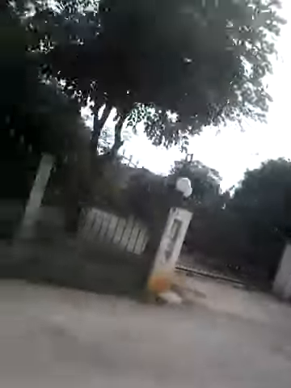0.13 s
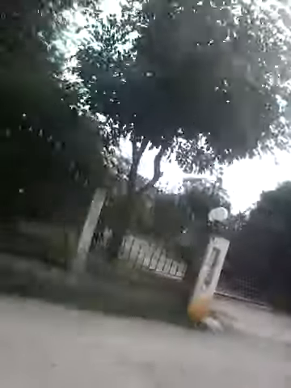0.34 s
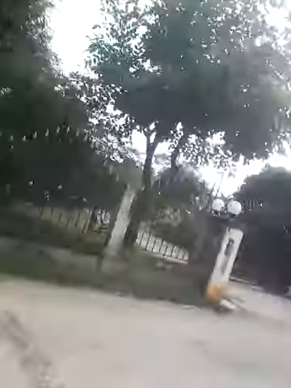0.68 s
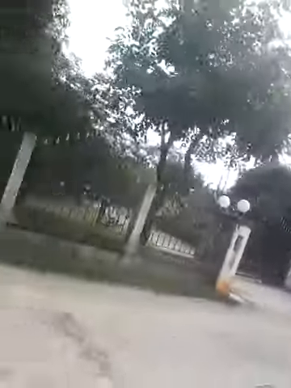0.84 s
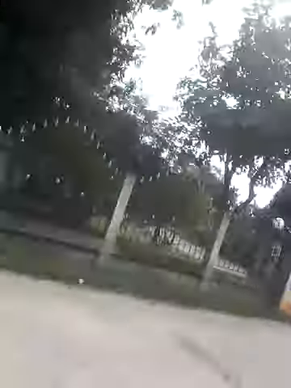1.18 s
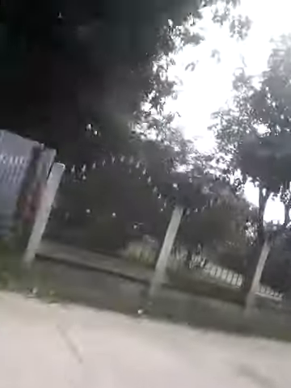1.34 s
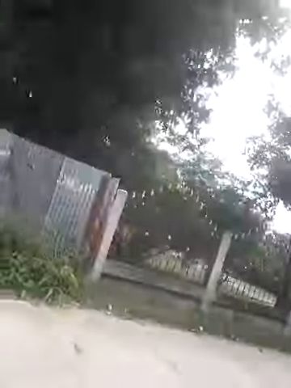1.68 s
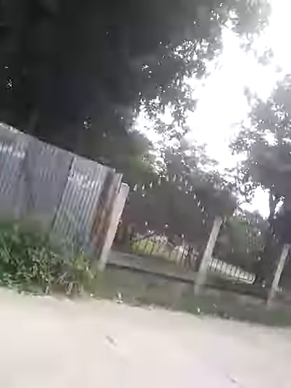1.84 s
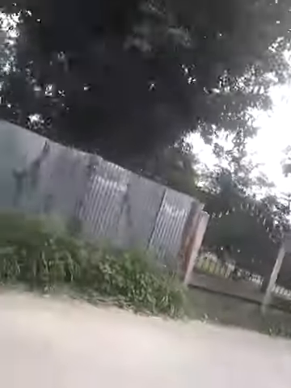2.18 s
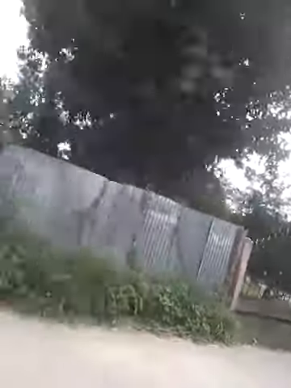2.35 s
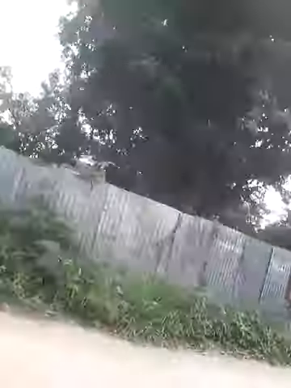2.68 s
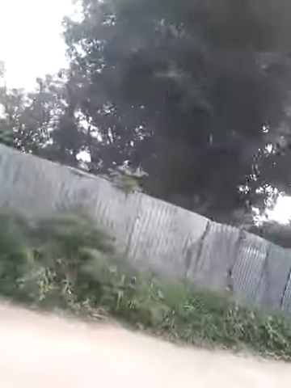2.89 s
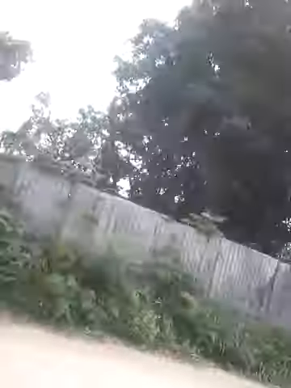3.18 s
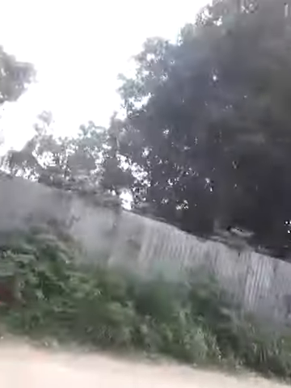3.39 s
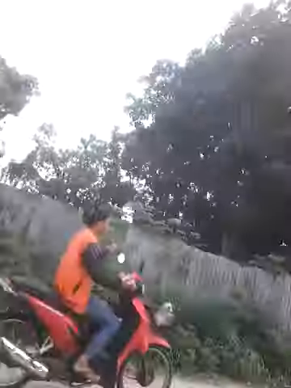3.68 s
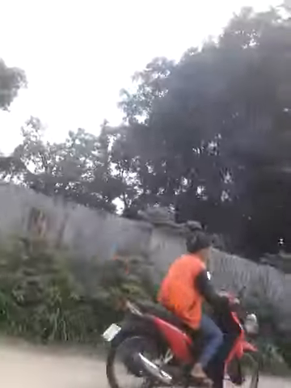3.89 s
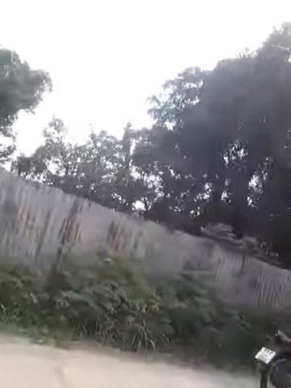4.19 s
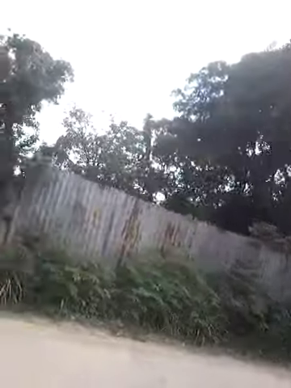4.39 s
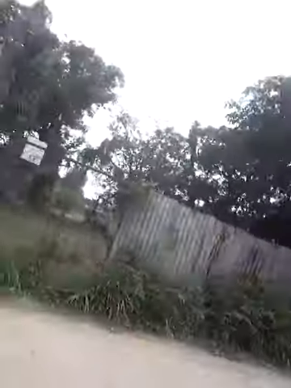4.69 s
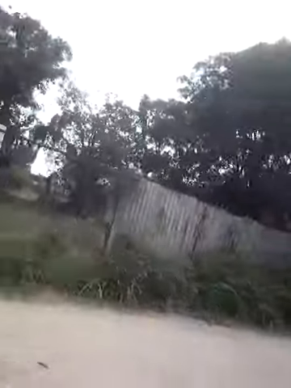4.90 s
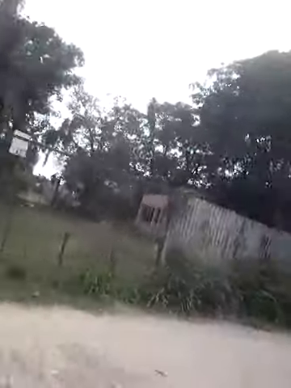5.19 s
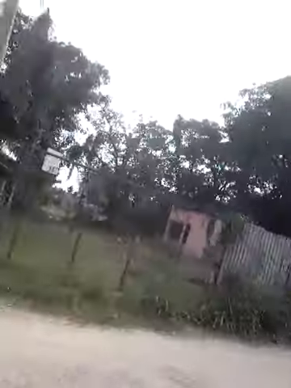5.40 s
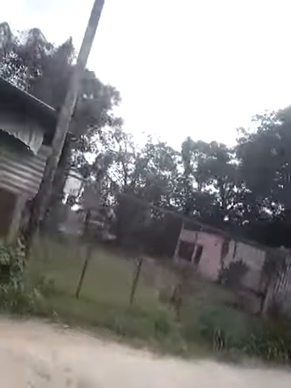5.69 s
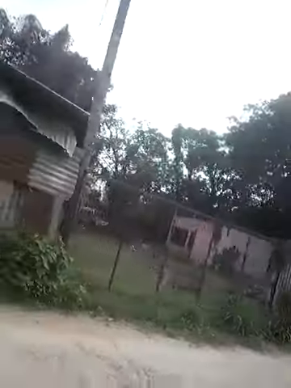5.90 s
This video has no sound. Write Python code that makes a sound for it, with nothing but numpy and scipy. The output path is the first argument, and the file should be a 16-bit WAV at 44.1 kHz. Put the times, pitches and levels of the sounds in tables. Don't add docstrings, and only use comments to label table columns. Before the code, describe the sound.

From a phone carried on a bicycle: tyres roar softly on grit, dull knocks come in irregular pairs, and loose metal ticks. A far vehicle hums by early. A small motorcycle then approaches, its exhaust thumping separately at each firing, passes very close with chain clatter and brief gear whine, and recedes. Hand rubs and one very hard tap hit the housing late, over low wind buffets.

```python
import sys
import numpy as np
from scipy import signal
from scipy.io import wavfile
from scipy.ndimage import uniform_filter1d, minimum_filter1d

SR = 44100
rng = np.random.default_rng(int(sys.argv[2]) if len(sys.argv) > 2 else 0)


def wav_out(sig):
    wavfile.write(sys.argv[1], SR, np.round(np.clip(np.atleast_2d(sig).T, -1, 1) * 32767).astype(np.int16))


def invert_db(x):
    u = np.asarray(x, float) / 20
    return 10 ** u


N = 266422
TIME_S = np.arange(N) / SR

# start_s, peak_db, pitch_hz, t60_s (time to fall 60 dB), swell_cycles
HARD_BUMPS = [(0.763, -19.5, 177, 0.19, 0.14), (.779, -18.5, 267, 0.016, 0.27),
              (1.0615, -9, 204.4, 0.028, 0.95), (1.078, -11, 158, 0.009, 0.23),
              (1.697, -9, 235, 0.032, 0.68), (1.7117, -15.5, 187, .053, 0.05),
              (1.961, -21, 204, 0.021, 0.093), (1.981, -19, 189, 0.081, 0.25),
              (3.7269, -11, 308, 0.025, 0.13), (3.7318, -21, 252.6, 0.084, 0.34),
              (3.7424, -12.5, 199, 0.016, 0.11), (3.7495, -11, 195.4, 0.062, 0.19),
              (3.7665, -13.5, 148, 0.01, 0.22), (4.002, -9.5, 171, 0.01, 0.038),
              (4.0244, -14.5, 192, .037, 0.26), (4.5946, -10, 193, 0.053, 0.13),
              (4.8379, -25, 276, 0.17, 0.54), (4.872, -12.5, 170, 0.028, 0.063),
              (5.248, -15.5, 270, 0.01, .25)]


def in_time(rows):
    s, *columns = np.transpose(rows)
    return [np.interp(TIME_S, s, column) for column in columns]


def rms_one(x):
    return x / np.sqrt(np.mean(x ** 2) + 1e-20)


def butter(x, hz, kind, order=2):
    return signal.sosfilt(signal.butter(order, hz, kind, fs=SR, output="sos"), x)


def noise(hz, kind, order=2):
    return rms_one(butter(rng.standard_normal(N), hz, kind, order))


def drift(rate):
    r = np.exp(-80 * np.pi * rate / SR)
    draws = rng.standard_normal(N // 40 + 2002)
    slow = signal.lfilter([1], [1, -2 * r, r * r], draws)[2000:]
    return np.interp(np.arange(N) / 40, np.arange(len(slow)), rms_one(slow))


def grains(per_s, spread_db):
    sizes = invert_db(spread_db * np.minimum(rng.exponential(1, (2, N)), 5))
    sizes *= rng.choice([-1, 1], (2, N))
    return sizes * (rng.random((2, N)) < per_s / SR)


def coloured(source, spectrum, patchy_db, rate):
    hz, level_db = np.transpose(spectrum)
    edges = hz[0] * 2 ** np.arange(0, np.log2(hz[-1] / hz[0]), .5)
    out, together = 0, drift(rate)
    for k, (low, high) in enumerate(zip(edges, edges[1:])):
        band_db = np.interp(np.log(low * high) / 2, np.log(hz), level_db)
        flicker_db = patchy_db * (0.23 * together + drift(rate))
        band = butter(source[k % 2], [low, high], "band", order=3)
        out = out + invert_db(band_db + flicker_db) * band
    return rms_one(out)


def add(out, s, peak_db, hz, t60, rise):
    t = np.arange(round(.15 * SR)) / SR
    fade = invert_db(-60 * t / max(t60, .004))
    ring = np.sin(2 * np.pi * hz * t) * fade * (1 - np.exp(-t / rise))
    i = round(s * SR)
    out[i:i + len(t)] += (invert_db(peak_db) * ring / np.abs(ring).max())[:N - i]


def distance_db(lead_s=0):
    nearest_s, gap_m, overtake_m_s = 3.753, 1.51, 3.64
    along_m = overtake_m_s * (TIME_S + lead_s - nearest_s)
    return -10 * np.log10(1 + (along_m / gap_m) ** 2)


def exhaust_puffs(fired, pulse_db, return_db, chance):
    puff_s, trip_s, widen, loss = .0052, .0095, 1.28, .4
    out = np.zeros(N + SR)
    for i, luck in zip(fired, chance):
        for k in range(5):
            height = 2.8 * loss ** k if k else 1
            puff = np.hanning(round(puff_s * widen ** k * SR))
            start = i + round((.0035 + k * trip_s) * SR) - len(puff) // 2
            level_db = pulse_db[i] + 1.0 + k * (return_db[i] + .7 * luck[0])
            level_db += .6 * luck[4] + .5 * luck[k]
            out[start:start + len(puff)] += puff * height * invert_db(level_db)
    return butter(out[:N], 900, "low")


def exhaust_thump(puffs):
    hz, width_hz, gain = 62, 12, 1.5
    r = np.exp(-np.pi * width_hz / SR)
    boom = signal.lfilter([(1 - r * r) / 2, 0, (r * r - 1) / 2],
                          [1, -2 * r * np.cos(2 * np.pi * hz / SR), r * r], puffs)
    suction = np.hanning(round(.0145 * SR))
    balanced = puffs - signal.fftconvolve(puffs, suction / suction.sum(), "same")
    return butter(balanced + gain * boom, 23, "high")


def pipe_rings(fired, pulse_db, chance):
    out, far_db = np.zeros(N), distance_db()
    for i, luck in zip(fired, chance):
        header_db, header_hz = pulse_db[i] - 20 + 3.9 * luck[3], 330 * np.exp(0.095 * luck[2])
        add(out, i / SR + 0.0021, header_db, header_hz, t60=0.061, rise=0.0025)
        echo_db = pulse_db[i] - 22.5 - 0.78 * far_db[i]
        add(out, i / SR + 0.0017, echo_db, 208, t60=0.059, rise=0.0042)
    return out


def gear_whine():
    # start_s, pitch_hz, level_db
    whine_path = [
        (3.1, 1520, -75),
        (3.44, 1490, -66),
        (3.52, 1495, -58),
        (3.6, 1500, -63),
        (3.72, 1520, -63),
        (3.745, 1525, -52),
        (3.83, 1523, -53),
        (3.86, 1490, -60),
        (4.2, 1425, -72),
    ]
    hz, level_db = in_time(whine_path)
    wobble = 1 + .35 * noise(25, "low")
    wavering_hz = hz + 15 * drift(10.5)
    return wobble * np.sin(np.cumsum(2 * np.pi * wavering_hz / SR)) * invert_db(level_db)


def clatter(gas_flow, pulse_db):
    level_db = -52.5 + 1.06 * distance_db(lead_s=0.04)
    level_db += -19.5 * (TIME_S < 2.1)
    rattle = rms_one(butter(grains(4000, spread_db=4.5)[0], [850, 1900], "band", order=4))
    return invert_db(level_db) * rattle * (0.79 + 0.13 * gas_flow / invert_db(pulse_db))


def motorcycle():
    # start_s, firings_so_far (count)
    firing_count = [(2.06, 0), (2.2405, 3), (2.6104, 9), (2.9661, 15), (3.3256, 21), (3.4496, 23),
                    (3.6922, 27), (4.1236, 34), (4.3147, 37), (4.6862, 43), (4.8784, 46), (5.0605, 49),
                    (5.3586, 54), (5.7051, 60), (6.045, 66)]
    # start_s, level_db (over cruising)
    throttle_path = [(2.1, -40), (2.3, -0.5), (2.45, -0.5), (2.58, 2.5), (2.85, -3.5), (3.3, -1),
                     (3.57, 1.2), (3.8, -1), (4.3, -0.5), (4.75, 1), (5.0, 0.5), (5.6, 2.5), (6.04, 2)]
    turns, = in_time(firing_count)
    throttle_db, = in_time(throttle_path)
    pulse_db = -10.5 + distance_db() + throttle_db
    return_db = -0.17 * throttle_db + 0.3 * distance_db()
    fired = np.flatnonzero(np.diff(np.floor(turns)) > 0)
    chance = rng.standard_normal((len(fired), 5))
    puffs = exhaust_puffs(fired, pulse_db, return_db, chance)
    gas_flow = butter(puffs, 37, "low")
    rasp = invert_db(-23.0) * gas_flow * noise([300, 800], "band")
    machinery = (gear_whine() + clatter(gas_flow, pulse_db)) * (turns > 9)
    return exhaust_thump(puffs) + pipe_rings(fired, pulse_db, chance) + rasp + machinery


def soft_contact(x):
    return butter(butter(x, 99, "high"), 850, "low", order=3)


def knock(out, s, peak_db, hz, t60, swell):
    rise = max(swell, .05) / hz
    add(out, s, peak_db, hz, t60, rise)
    add(out, s, peak_db - 8, hz * 0.744, t60 * .9, rise)
    add(out, s, peak_db - 14, hz * 2.3, t60 * .45, rise=.001)


def bumps():
    # start_s, peak_db, pitch_hz
    soft_bumps = [(.3, -27, 156), (0.4092, -22.5, 159), (0.427, -28.5, 163), (0.508, -45, 202),
                  (0.69, -28, 242), (0.708, -23.5, 144), (1.008, -28, 295), (1.037, -20, 163),
                  (1.418, -29, 132), (1.501, -33, 162), (2.002, -29, 178), (2.021, -19.5, 126),
                  (2.2204, -25, 106), (2.233, -21, 141), (2.268, -24, 236), (2.297, -25, 193),
                  (4.0123, -24, 207), (4.3285, -13.5, 186), (4.502, -21.5, 210), (4.607, -9, 113.5),
                  (4.685, -28, 147), (4.75, -16, 195), (4.8435, -14.5, 189), (4.939, -22, 122),
                  (5.539, -27, 248), (5.911, -22.5, 135), (3.056, -25.5, 127), (5.311, -24, 136),
                  (5.379, -28.5, 170), (5.46, -24, 148.7)]
    out, blows = np.zeros(N), np.zeros(N)
    soft = [(s, peak_db, hz, 12.2 / hz, 0.19) for s, peak_db, hz in soft_bumps]
    for s, peak_db, hz, t60, swell in list(HARD_BUMPS) + soft:
        knock(out, s, peak_db, hz, t60, swell)
        blows[round(s * SR)] = invert_db(peak_db - 26)
    shudder = signal.lfilter([1], [1, -invert_db(-60 / (0.1 * SR))], blows + 1e-18)
    rattle = rms_one(butter(grains(1500, spread_db=5.0)[0], [280, 800], "band"))
    return soft_contact(out + butter(shudder, 110, "low") * rattle)


def loose_parts():
    # start_s, peak_db, pitch_hz
    ticks = [(0.029, -52, 1080), (.167, -48, 1090), (.24, -46.5, 1045), (.325, -47, 1030),
             (.542, -48, 1030), (.881, -49, 1240), (.972, -51.5, 2040), (1.301, -53, 1000),
             (1.365, -41.5, 640), (1.427, -61, 2300), (2.667, -53, 700), (2.668, -63, 2070),
             (2.85, -48, 710), (3.149, -41, 650), (3.208, -46, 1130), (3.208, -52, 1810), (4.114, -43, 594),
             (4.152, -58, 2220), (4.229, -65, 900), (4.251, -47, 690), (4.424, -42.5, 1210),
             (4.422, -53.5, 2120), (4.84, -28, 708), (4.87, -48, 766), (4.974, -58, 2280),
             (5.123, -45.5, 1060), (5.799, -50, 1090), (5.453, -43, 820), (5.539, -43.5, 870),
             (5.887, -50, 900)]
    # start_s, peak_db, pitch_hz
    snaps = [(0.779, -53, 1700), (.9725, -55, 4370), (.9737, -55, 2900), (1.009, -53, 900),
             (1.911, -54, 1890), (2.667, -43, 900), (2.85, -50, 890), (3.208, -43, 1490), (4.114, -46, 800),
             (4.23, -47, 900), (4.251, -48, 800), (4.534, -39, 900), (2.64, -52, 1900), (2.975, -58, 2330),
             (3.54, -53, 2300), (4.865, -54, 3470), (2.037, -57, 2200), (4.456, -53, 3260),
             (4.506, -47, 1800), (4.825, -55, 5900), (5.125, -55, 2300), (5.294, -29, 1060),
             (5.307, -41, 1300), (5.656, -50, 1300), (5.866, -51, 1450)]
    hits = [(s, peak_db, hz, 0.0088) for s, peak_db, hz in snaps]
    hits += [(s, peak_db, hz, 0.058) for s, peak_db, hz in ticks]
    for s, peak_db, hz, _, swell in HARD_BUMPS:
        widest_s = s + 1.6 * swell / hz
        part_hz = 1212 * np.exp(0.067 * rng.standard_normal())
        hits.append((widest_s, 1.94 * peak_db - 16, part_hz, 0.0086))
    out = np.zeros(N)
    for s, peak_db, hz, t60 in hits:
        add(out, s, peak_db, hz, t60, rise=.0005)
        add(out, s, peak_db - 12.5, hz * 1.304, t60 * 0.16, rise=0.00026)
        add(out, s, peak_db - 7, hz * .62, t60 * .6, rise=.0005)
        add(out, s, peak_db - 1.5, hz * 1.097, t60, rise=0.00088)
        add(out, s, peak_db - 19.0, hz * 2.3, t60 * .5, rise=0.001)
    return out


def finger_taps():
    # start_s, peak_db, pitch_hz, t60_s
    taps = [
        (4.341, -26.5, 627, 0.029),
        (4.535, -29, 500, 0.006),
        (5.292, 1, 560, 0.01),
        (5.298, -1, 223, 0.0082),
        (5.453, -37.5, 473, 0.046),
        (5.866, -32, 740, .01),
    ]
    out = np.zeros(N)
    for s, peak_db, hz, t60 in taps:
        knock(out, s, peak_db, hz, t60, swell=.5)
    return soft_contact(out)


def hand_rubs():
    # fullest_contact_s, level_db, build_up_s, hold_s
    rubs = [
        (4.714, -55.5, .05, 0.025),
        (4.771, -37.5, 0.082, 0.025),
        (4.823, -51.5, 0.013, 0.032),
        (4.882, -46.5, 0.025, 0.026),
        (5.123, -58, 0.024, 0.023),
        (5.19, -61, 0.099, 0.044),
        (5.247, -53.5, 0.073, 0.02),
    ]
    # pitch_hz, level_db (per Hz)
    rub_colour = [(120, -10), (288, -1), (676, -6), (900, -14), (1300, -14), (1830, -18), (3200, -27),
                  (15500, -59)]
    level = 0
    for s, level_db, build_s, hold_s in rubs:
        before_s, after_s = np.maximum(s - TIME_S, 0), np.maximum(TIME_S - s, 0)
        lifted_s = np.maximum(TIME_S - s - hold_s, 0)
        level = level + invert_db(level_db - 32 * before_s / build_s - 152 * after_s - 2202 * lifted_s)
    slips = coloured(grains(12000, spread_db=2.0), rub_colour, patchy_db=-0.5, rate=15)
    pressure = level / level.max()
    dull = butter(slips, 2200, "low", order=1)
    return invert_db(14.0) * level * (dull + pressure * (slips - dull))


def tyre_roar():
    # start_s, level_db
    surface = [(0.0, -46), (0.72, -45.5), (1.1, -40.5), (1.55, -44.5), (2.1, -44), (3.45, -40.5),
               (4.1, -45.5), (4.65, -41.5), (5.0, -45.5), (5.3, -47), (6.04, -49)]
    # pitch_hz, level_db (per Hz)
    tyre_colour = [(150, -41.5), (250, -2), (313, -6.5), (446, -11.5), (598, 2), (756, -11), (818, -13),
                   (920, -10), (1310, -14), (1620, -18), (2600, -26.5), (3380, -69), (5720, -120)]
    level_db, = in_time(surface)
    roar = coloured(grains(3000, spread_db=2.0), tyre_colour, patchy_db=2.5, rate=39)
    muffled = .75 * butter(roar, 1550, "low", order=4) + .25 * roar
    return invert_db(level_db - 0.5) * muffled


def frame_rumble():
    # pitch_hz, level_db (per Hz)
    rumble_colour = [(24, -37), (40, -9), (113, 1), (187, -5.5), (231, -7), (500, -20.5), (650, -30),
                     (1100, -120)]
    level_db = np.where((TIME_S > 1.43) & (TIME_S < 5.4), -34.5, -39)
    rumble = coloured(grains(900, spread_db=3.5), rumble_colour, patchy_db=3.5, rate=5.7)
    return invert_db(uniform_filter1d(level_db, size=SR // 8)) * rumble


def wind():
    # middle_s, peak_db, half_length_s
    gusts = [(0.0, -20, 0.017), (0.306, -37.5, 0.29), (0.69, -34.5, 0.17), (1.1, -37.5, 0.21),
             (1.418, -37.5, 0.13), (1.82, -44, 0.17), (2.204, -37, 0.23), (2.83, -39, 0.09),
             (3.337, -43, 0.27), (3.744, -47, .15), (4.1, -35, 0.13), (4.516, -30.5, 0.13),
             (4.83, -33.5, 0.11), (5.186, -31.5, 0.033), (5.32, -34, 0.14)]
    level = invert_db(-71.5)
    for s, peak_db, half_s in gusts:
        level = level + invert_db(peak_db) * np.exp(-((TIME_S - s) / half_s) ** 2)
    return level * rms_one(butter(butter(rng.standard_normal(N), 78, "low", order=4), 34, "high"))


def far_vehicle():
    # pitch_hz, level_db
    hums = [
        (410, -50),
        (585, -46.5),
        (690, -52.5),
        (870, -51),
    ]
    t = TIME_S - 1.12
    out = invert_db(-52) * noise([480, 1450], "band", order=5)
    for hz, hum_db in hums:
        pitch = hz * (1 - .03 * t + .03 * drift(14.0))
        out += invert_db(hum_db - 1 + 5.8 * drift(10.3)) * np.sin(np.cumsum(2 * np.pi * pitch / SR))
    return out / (1 + (t / 0.28) ** 4)


def leaves():
    return invert_db(-74.5) * noise([1800, 4500], "band") * invert_db(1.4 * drift(10.0))


def scene():
    bicycle = bumps() + loose_parts() + tyre_roar() + frame_rumble()
    hand = finger_taps() + hand_rubs()
    return (motorcycle() + bicycle + hand + wind() + far_vehicle() + leaves())[None]


def band_limit(x):
    return signal.sosfilt(signal.butter(12, 15770, fs=SR, output="sos"), x)


def record(dry):
    hiss = rms_one(rng.standard_normal(N)) * invert_db(-64)
    hiss += invert_db(-88) * np.sin(2 * np.pi * 15625 * TIME_S)
    turned_down_db = -3.5 * np.maximum(TIME_S - 5.09, 0)
    x = (dry + hiss) * invert_db(turned_down_db)
    gain = np.minimum(1, .6 / (np.abs(x) + 1e-9))
    ahead = round(.016 * SR)
    gain = uniform_filter1d(minimum_filter1d(gain, size=2 * ahead), size=ahead)
    top_cut = signal.sosfilt(signal.ellip(12, .2, 60, 15750, fs=SR, output="sos"), x * gain)
    return band_limit(1.025 * top_cut)


dry = scene()
out = record(dry)
wav_out(out)
```